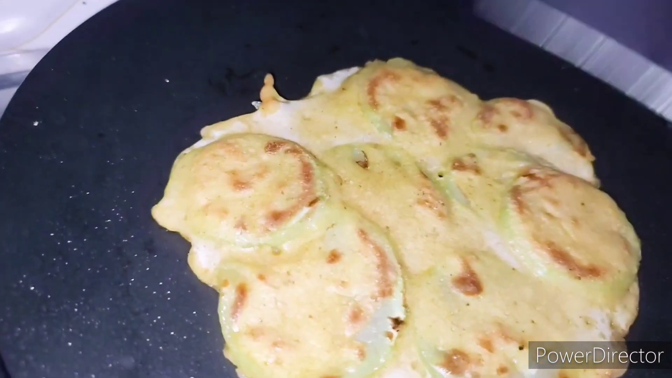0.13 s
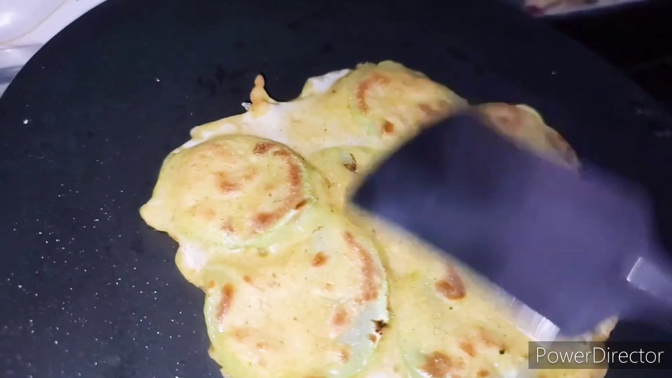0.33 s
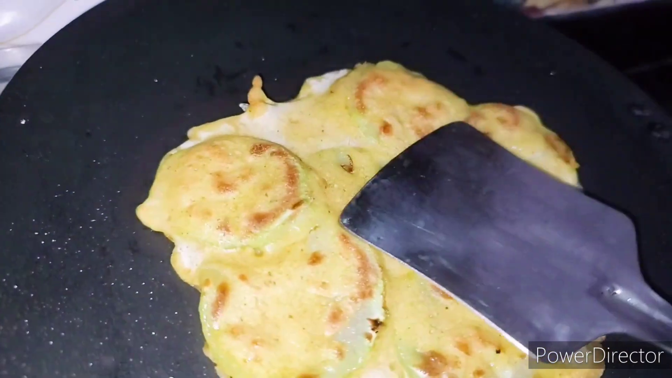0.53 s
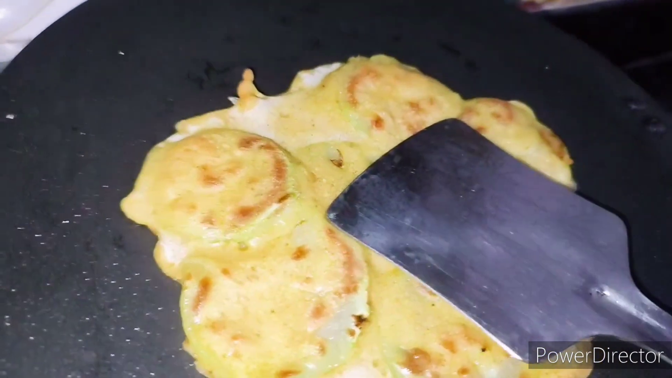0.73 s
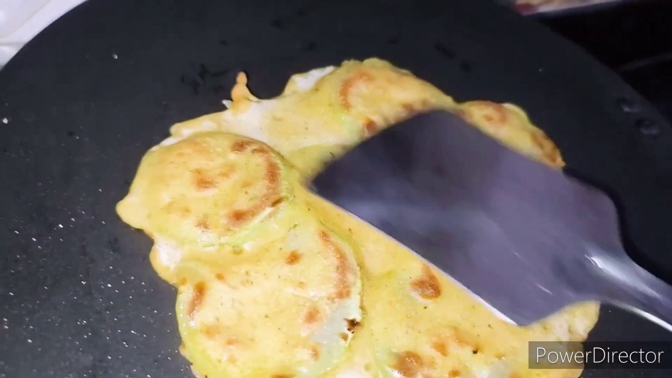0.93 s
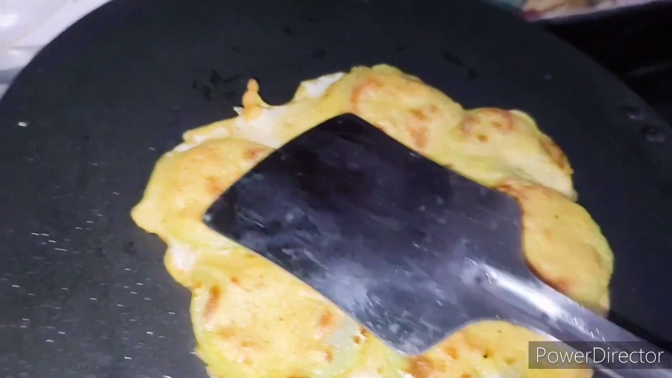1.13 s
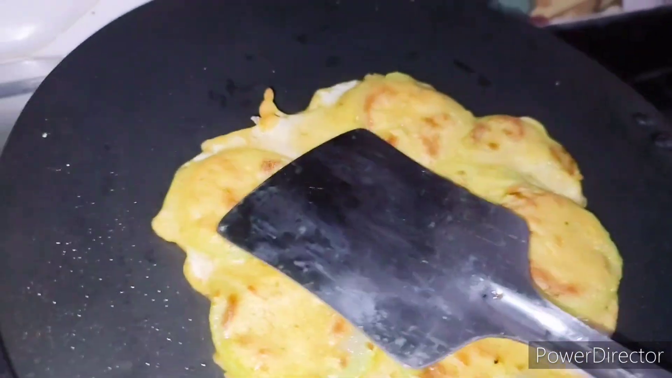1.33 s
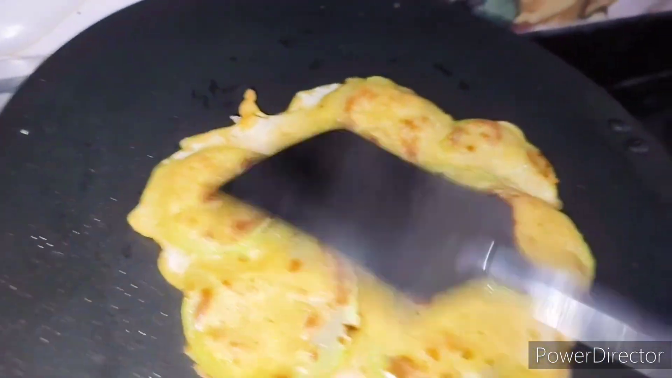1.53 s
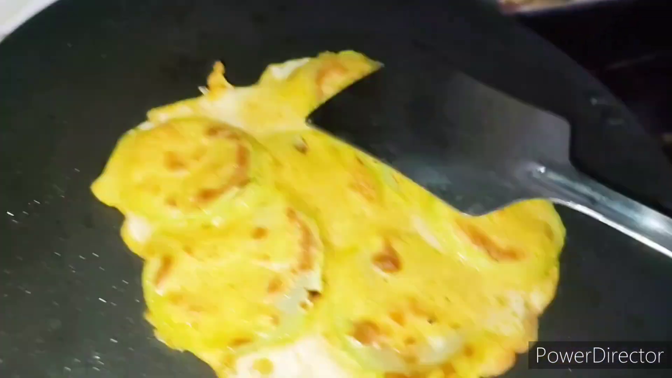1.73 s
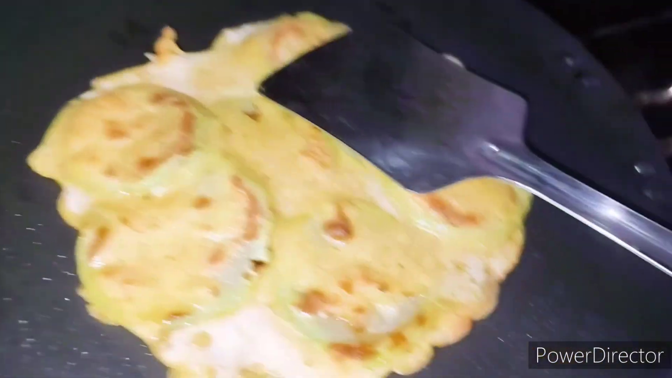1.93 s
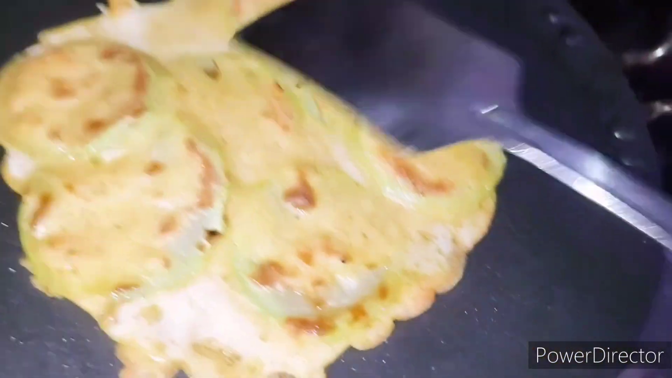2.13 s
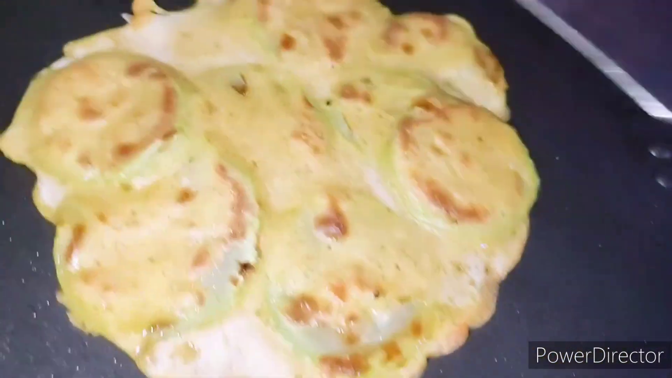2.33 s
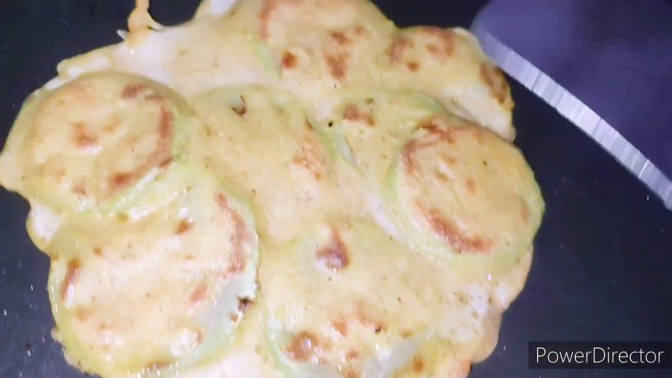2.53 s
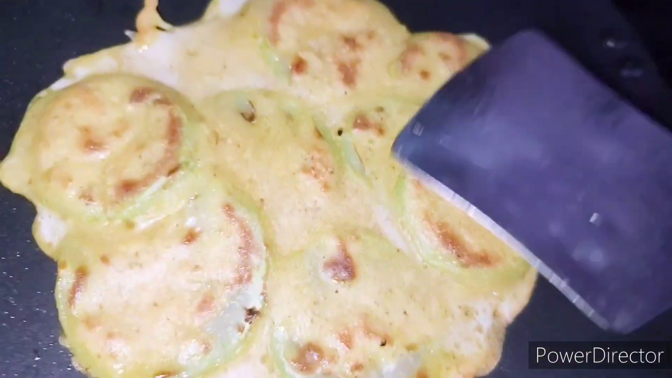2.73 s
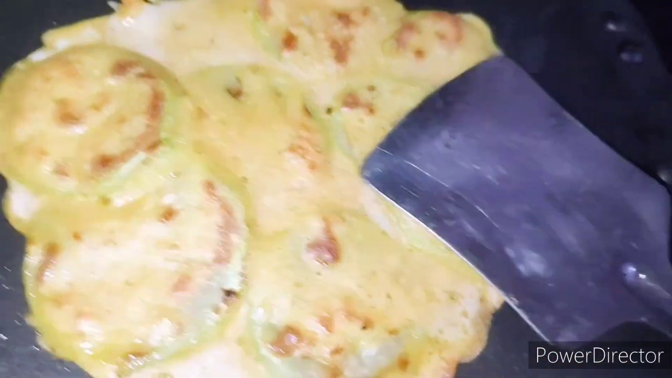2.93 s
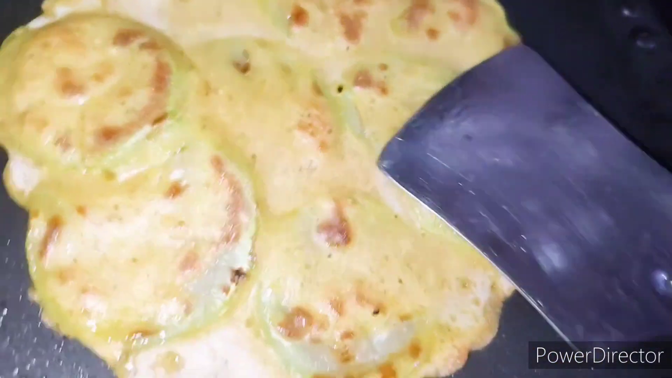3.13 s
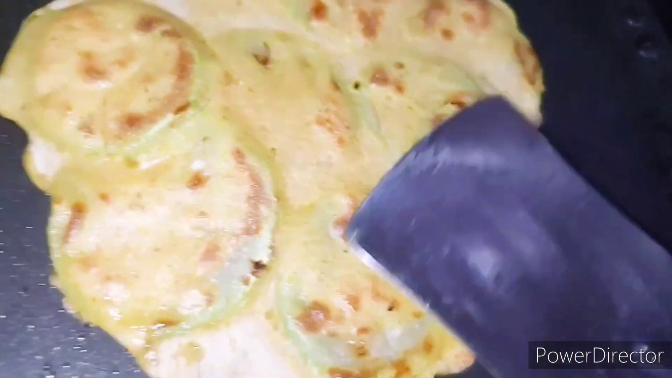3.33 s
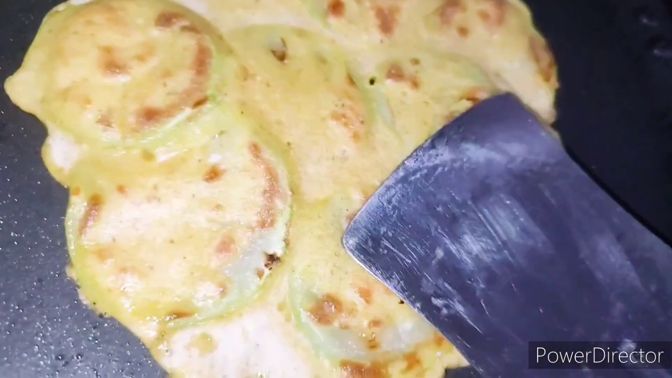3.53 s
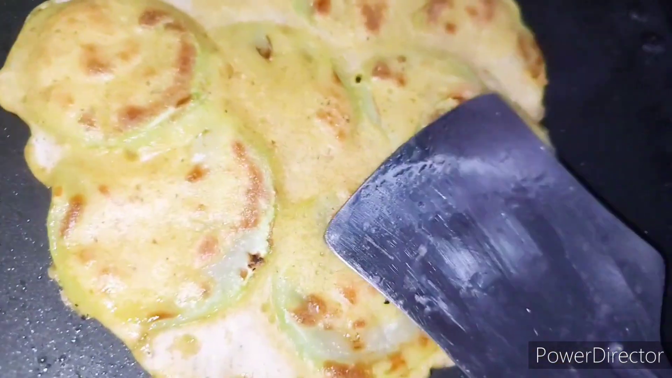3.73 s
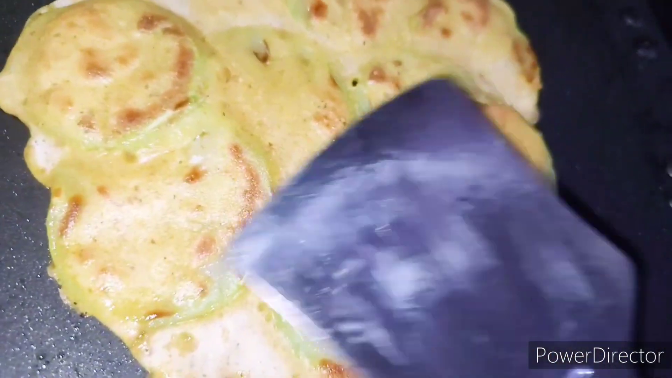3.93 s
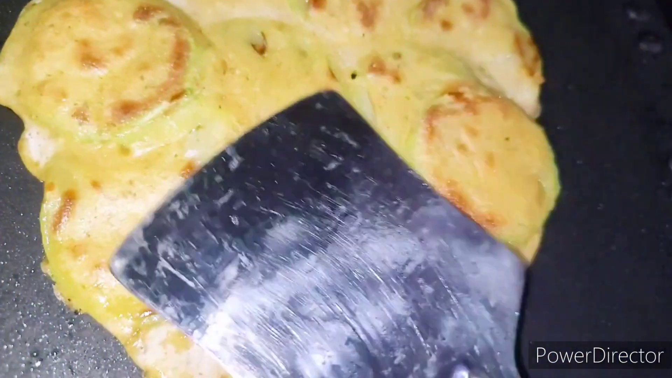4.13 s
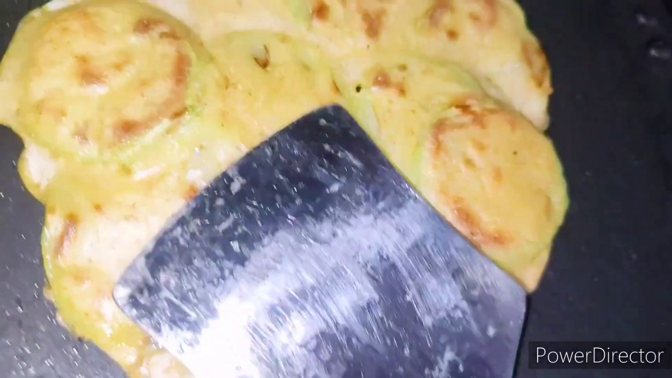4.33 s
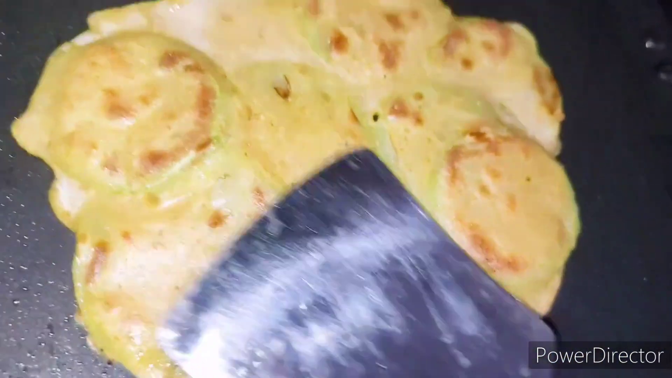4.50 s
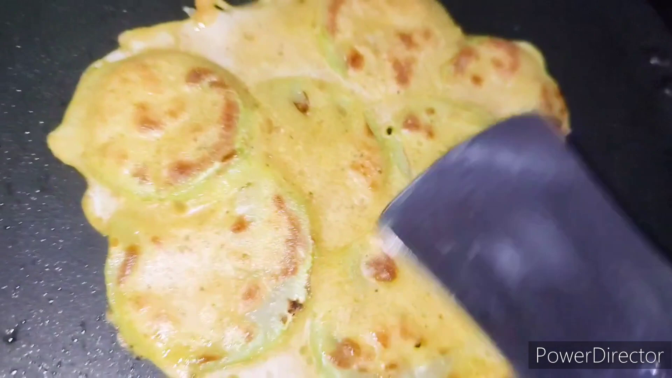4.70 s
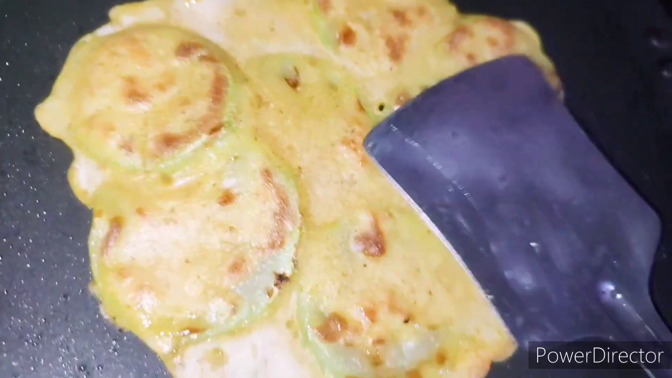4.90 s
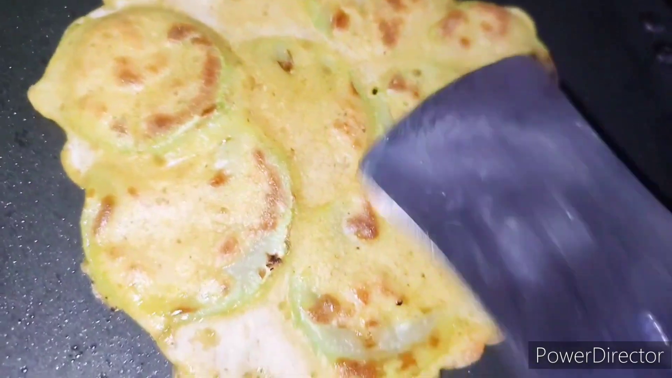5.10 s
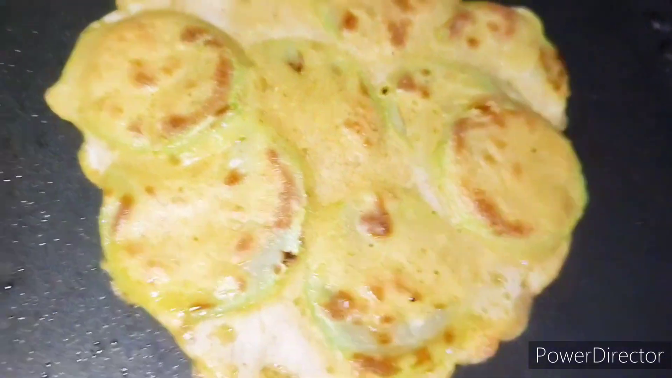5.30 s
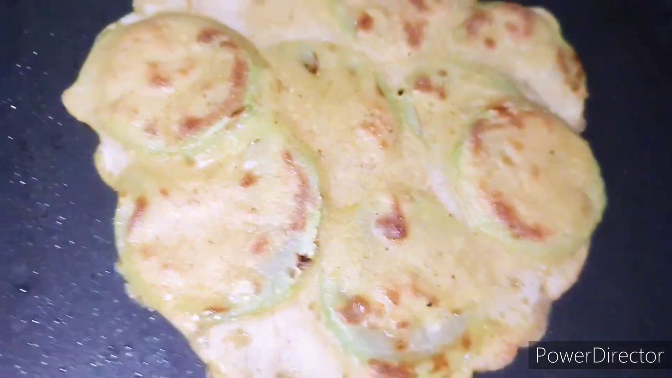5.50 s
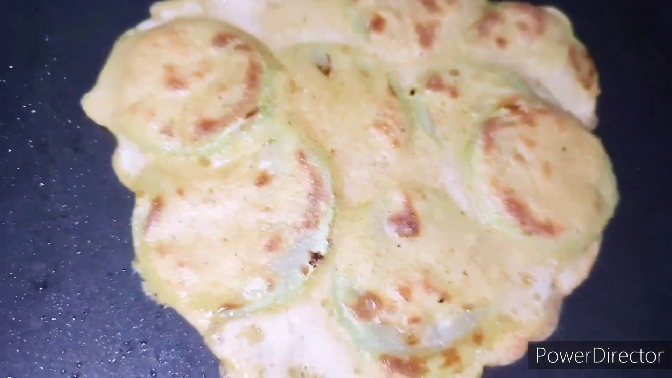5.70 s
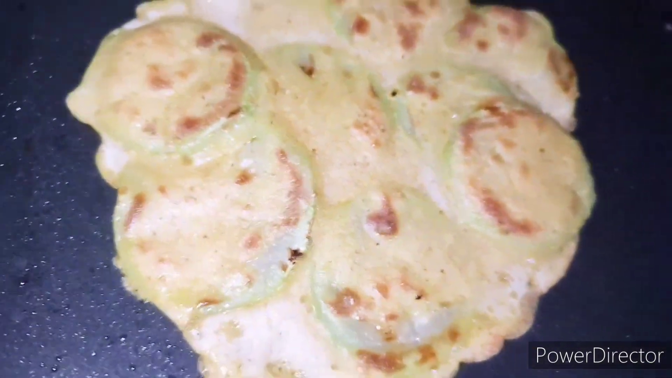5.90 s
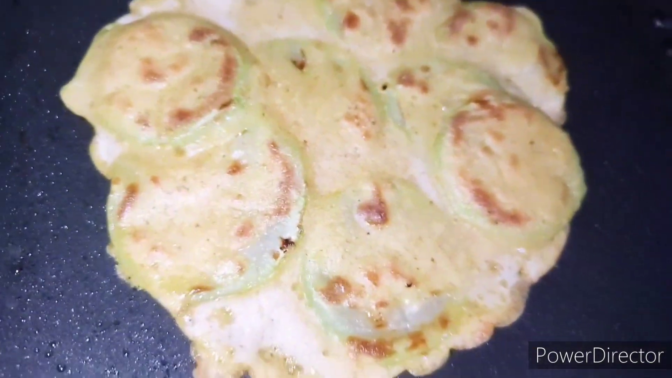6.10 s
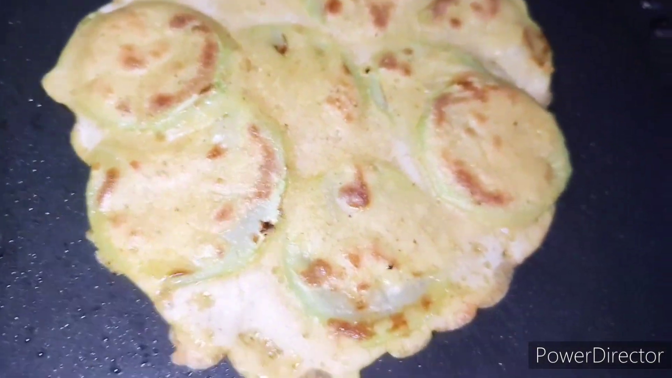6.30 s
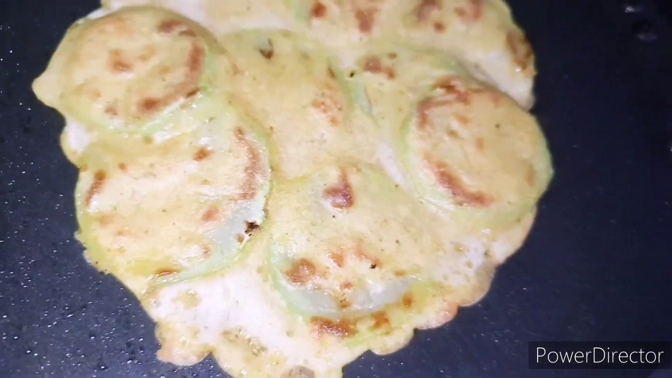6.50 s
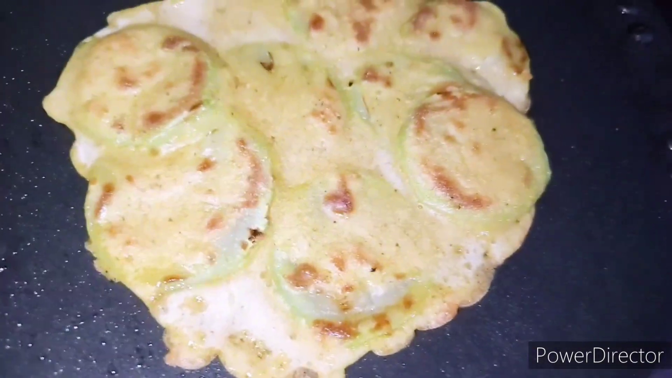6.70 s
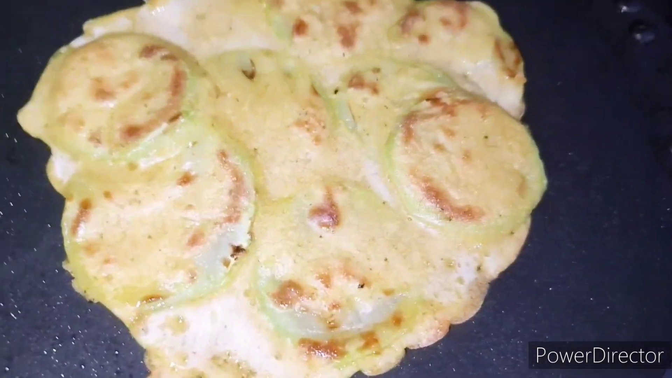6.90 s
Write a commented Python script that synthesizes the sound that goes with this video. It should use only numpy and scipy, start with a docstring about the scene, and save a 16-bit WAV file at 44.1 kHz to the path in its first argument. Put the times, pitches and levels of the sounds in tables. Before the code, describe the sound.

Sharp hisses and spitting fat rise as a pancake is squeezed, between hard resonant knocks, light metal clicks and a bouncing spatula clink.

```python
"""A pancake is pressed with a metal spatula on a hot griddle in a small, hard kitchen.
Each press squeezes out hissing steam, made of filtered noise and bubble bursts, and spitting fat,
made of short noise snaps. Dull and sharp knocks shake a cabinet and ring round the room as beating
modes, and swells of the low hiss near 1.4 s add to their ringing; the spatula edge clicks on the
griddle, and the spatula clinks and bounces as it is put down. Shaped noise gives the quiet hum."""
import sys
import numpy as np
from scipy import signal
from scipy.fft import rfft, irfft
from scipy.io import wavfile
from scipy.ndimage import uniform_filter1d

SR = 44100
rng = np.random.default_rng(int(sys.argv[2]) if len(sys.argv) > 2 else 0)


def persist_wave(psi):
    """Save psi, clipped to +-1, as 16-bit WAV."""
    counts = np.round(np.clip(psi, -1, 1) * 32767).astype(np.int16)
    wavfile.write(sys.argv[1], SR, np.atleast_2d(counts).T)


N = 306479
AFTER = np.arange(32768) / SR  # time since a blow (s)

# when the blade goes to a new spot with a new gap, and the end: start_s
MOVES_S = [0, 2.84, 4.3, 6.4, 7]
# hiss colour of the gap under the blade, one spectrum per spot: freq_hz, density_db (dB per Hz)
GAPS = [
    [(290, -50), (500, -17), (803, -17.5), (1220, -14), (1430, -6.5), (1850, -11), (2040, -15),
     (2860, -7.5), (3350, -10.5), (3900, -6.5), (4500, -11), (6200, -10), (6750, -4), (9700, -4.5),
     (15500, -7)],
    [(240, -29), (400, -5), (586, -7), (784, -8), (1360, -0.5), (1740, -7), (2880, -1.5), (3150, -7.5),
     (4450, -9), (4750, -3.5), (5560, -0.5), (7200, -5.5), (8700, -9.5), (11300, -12.5), (14500, -9.5),
     (15500, -7)],
    [(290, -59), (500, -9), (927, -11), (1220, -3), (1990, -8.5), (2330, -3.5), (4570, -6), (6360, -1),
     (15500, -4.5)],
    [(200, -20), (500, -18), (1300, -11.5), (1950, -18), (3100, -8), (4500, -9), (4900, -19), (5450, -23),
     (5900, -3), (8300, -8.5), (10200, -4), (12200, -11), (14300, -6.5), (15500, -4.5)],
]


def sizzle(crackle_db=1.0, livelier=0.13, split_hz=4500, gusts_db=0.83, gust_s=0.0068):
    """Steam hiss plus a dense crackle of bursting bubbles, coming in gusts and coloured by the gap."""
    steam = rng.standard_normal(N)
    bursts = crackle(spread_db=4.0, per_s=450, burst_s=0.0004)

    # levels move slowly, so work them out every 128 samples
    coarse = np.arange(0, N + 128, 128) / SR
    upper, lower = (np.interp(np.arange(N) / SR, coarse, g) for g in hiss_levels(coarse))

    # a louder upper hiss crackles more; crackle_db is the balance at an upper hiss of -47 dB
    share = gain_of(crackle_db + livelier * (20 * np.log10(upper) + 47))
    share = np.minimum(share, 1.5)
    blend = (steam + share * bursts) / np.sqrt(1 + share ** 2)

    # more crackle also means deeper gusts
    gusts = evened(smoothed(rng.standard_normal(N), gust_s))
    mixed = gain_of(gusts_db * share * gusts) * blend

    lowpass = signal.butter(4, split_hz, fs=SR, output="sos")
    out = np.zeros(N)
    for start, end, gap in zip(MOVES_S, MOVES_S[1:], GAPS):
        at = slice(round(start * SR), round(end * SR))
        raw = nearby(coloured(mixed[at], gap))
        low = signal.sosfiltfilt(lowpass, raw)
        high = raw - low
        out[at] = (upper[at] * high + lower[at] * low) / np.std(high)
    return out


# swells of the hiss: squeezes of the blade, and near 1.4 s the ringing after the knocks:
# full_swell_s (full contact in a squeeze), fall_s (the lift in a squeeze), upper_hiss_db (at fall_s),
# lower_hiss_db (against the upper); a fall before the full swell overlaps the rise and peaks lower
SWELLS = [(0.555, 0.882, -35.5, 1), (1.32, 1.4, -60, 15), (1.477, 1.44, -54, 16), (3.063, 3.129, -38, -1.5),
          (3.447, 3.447, -54, -6), (3.68, 3.7, -55, -1.5), (4.18, 4.15, -52, -19), (4.415, 4.48, -54.5, 5),
          (4.54, 4.26, -51, -6), (4.774, 4.778, -52.5, 4), (5.059, 5.076, -53.5, 8),
          (5.171, 5.216, -43, -3.5), (5.266, 5.298, -55, 1), (5.49, 5.46, -48.5, -2),
          (5.802, 5.83, -51.5, 4.5), (6.424, 6.468, -52, 2), (6.58, 6.963, -30, -1)]
# quiet hiss between squeezes; its raised lower part at 1.4-1.6 s is the knocks ringing on:
# start_s, upper_hiss_db, lower_hiss_db (against the upper)
QUIET_HISS = [(0, -72.5, -24), (.42, -77, -20), (1.02, -61.5, 0), (1.4, -62, 18.5), (1.6, -65, 24),
              (1.85, -66.5, 11.5), (2.8, -67.5, 2), (2.9, -59.5, -9.5), (2.96, -53.5, 0), (3.3, -58, 0),
              (3.9, -59, -3), (4.3, -64.5, 3), (4.65, -61.5, 15.5), (5.001, -64.5, 5), (5.4, -63, 0.5),
              (6.0, -60.5, 10), (6.36, -63.5, 0.5)]
# the hiss shoots up until the full swell, climbs on while held and then drops
RISE_DB_PER_S, LOW_RISE_DB_PER_S, HELD_DB_PER_S = 172.5, 108, 29.5
FALL_DB_PER_S, LOW_FALL_DB_PER_S = 178, 192.5


def hiss_levels(t):
    """Gains of the upper and the lower hiss: the quiet hiss and every swell, added as powers."""
    full, fall, top_db, low_db = np.transpose(SWELLS)[:, :, None]
    early = np.maximum(full - t, 0)
    late = np.maximum(t - fall, 0)
    held_db = top_db - HELD_DB_PER_S * np.clip(fall - t, 0, abs(fall - full))
    upper_db = held_db - RISE_DB_PER_S * early - FALL_DB_PER_S * late
    lower_db = held_db + low_db - LOW_RISE_DB_PER_S * early - LOW_FALL_DB_PER_S * late

    s, quiet_db, quiet_low_db = np.transpose(QUIET_HISS)
    quiet_upper = gain_of(np.interp(t, s, quiet_db))
    quiet_lower = gain_of(np.interp(t, s, quiet_db + quiet_low_db))
    upper_power = (gain_of(upper_db) ** 2).sum(0) + quiet_upper ** 2
    lower_power = (gain_of(lower_db) ** 2).sum(0) + quiet_lower ** 2
    return np.sqrt(upper_power), np.sqrt(lower_power)


def crackle(spread_db, per_s, burst_s, edges_hz=(5200, 10500)):
    """Bubbles of very unequal size burst at random as dying noise, independently in each band."""
    hz = np.fft.rfftfreq(N, 1 / SR)
    spectrum = 0
    for below, above in zip((1e-3,) + edges_hz, edges_hz + (1e6,)):
        sizes = gain_of(spread_db * np.minimum(rng.standard_exponential(N), 2.6))
        hits = sizes * (rng.random(N) < per_s / SR)
        bursts = evened(smoothed(hits, burst_s) * rng.standard_normal(N))
        # band powers that add up to a flat spectrum
        band_power = 1 / (1 + (hz / above) ** 4) - 1 / (1 + (hz / below) ** 4)
        spectrum = spectrum + rfft(bursts) * np.sqrt(band_power)
    return evened(irfft(spectrum, N))


def nearby(x, echo_db=-10.5, echo_s=0.0045):
    """Blade, griddle and hob throw the hiss back within milliseconds and ripple its colour finely."""
    taps = rng.standard_normal(1024) * np.exp(-AFTER[:1024] / echo_s)
    return x + gain_of(echo_db) * signal.oaconvolve(x, taps / np.linalg.norm(taps))[:len(x)]


# the clearest spits of fat: start_s, peak_db, centre_hz (before the colour of the gap)
SPITS = [(0.1182, -41, 11400), (0.5114, -47, 3780), (0.537, -24, 5000), (0.5732, -23.5, 7750),
         (0.642, -20, 8370), (0.695, -14.5, 9100), (0.7064, -17.5, 7900), (0.7212, -15, 8730),
         (0.7473, -16, 8000), (0.7542, -19, 5940), (0.767, -21, 7740), (0.8175, -21, 7840),
         (0.865, -23, 9300), (0.875, -22, 8000), (0.8858, -17.5, 7900), (0.9516, -27.5, 11000),
         (0.971, -28.5, 8142), (1.012, -32, 13400), (1.137, -35, 12000), (1.2391, -30.5, 6930),
         (1.283, -39, 5000), (1.324, -27.5, 2620), (1.376, -41, 10000), (1.4, -28.5, 6000),
         (1.4703, -32.5, 3480), (1.477, -34, 10000), (1.984, -43.5, 2540), (2.1279, -36.5, 13100),
         (3.083, -23, 6870), (3.0969, -24, 3500), (3.13, -22, 3500), (3.31, -32.5, 6470),
         (3.466, -37, 2400), (4.1673, -31.5, 4200), (4.41, -32, 11000), (4.47, -32, 10500),
         (4.532, -29, 11000), (4.547, -33, 11200), (4.559, -22, 9000), (4.763, -31, 2800),
         (4.804, -31, 11400), (5.0677, -30.5, 3500), (5.1552, -21, 9720), (5.184, -27, 6340),
         (5.198, -20.5, 8090), (5.1696, -27, 9000), (5.219, -24, 6230), (5.247, -24.5, 9200),
         (5.273, -22.5, 10000), (5.2939, -25.5, 9150), (5.493, -34, 9240), (5.789, -29, 6300),
         (5.806, -30.5, 7000), (5.821, -33, 7000), (6.136, -32, 8550), (6.4198, -31, 3966),
         (6.4848, -36, 6000), (6.5303, -22, 9900), (6.5591, -28, 8000), (6.5936, -26, 9000),
         (6.62, -19, 6000), (6.648, -4.5, 5360), (6.676, -14.5, 10700), (6.7181, -13.5, 7850),
         (6.763, -15.5, 11000), (6.779, -21, 9000), (6.82, -29, 5740), (6.843, -24.5, 11900),
         (6.87, -23.5, 10100), (6.9465, -18.5, 6000)]


def spits(width_oct=0.79, wider_oct_per_db=0.047, decay_s=0.00061, tail_db=-15.0, pop=4.0):
    """A sharp pop in a snap of noise with a faint short tail, leaving through the gap; large is wider."""
    out = np.zeros(N)
    t = np.arange(1024) / SR
    hz = np.fft.rfftfreq(1024, 1 / SR)
    # fades in over 0.3 ms; the tail loses 60 dB in 11 ms
    envelope = (1 - np.exp(-t / 0.0003)) * (np.exp(-t / decay_s) + gain_of(tail_db - 60 * t / 0.011))
    for s, db, centre_hz in SPITS:
        burst = rng.standard_normal(1024)
        burst[8] += pop
        width = width_oct + wider_oct_per_db * (db + 38.5)
        band = np.exp(-(np.log2((hz + 1) / centre_hz) / width) ** 2 / 2)
        snap = irfft(rfft(burst) * band) * envelope
        snap = coloured(snap, GAPS[np.searchsorted(MOVES_S, s) - 1])
        add(out, s, gain_of(db) * peaked(snap))
    return out


# knocks: start_s, peak_db (before the room), tilt_db (per octave), boom_db (before its swell),
# thud_db (before swell and decay), room_db (against the blow), length (factor on boom, thud, room),
# dullness (0-1)
KNOCKS = [(1.2503, -25, -2.5, -28, -36, -1, 1.38, 1.0), (1.5198, -4.5, 2.5, -16, -32, -10, 1.05, 0.05),
          (1.771, -28, -2, -63, -53.5, -12.5, 0.93, .6), (4.334, -17.5, 1, -32, -34, -6.5, 1.07, .8),
          (4.477, -30, 5, -48.5, -73.5, -25, .5, .6), (4.494, -5, 1.5, -17, -30, -12, 0.94, 0.05)]
# contact noise of a knock: freq_hz, density_db (dB per Hz)
CRACK = [(60, -59.5), (200, -12.5), (600, -16.5), (1450, 1), (2000, -6.5), (2900, -4), (3900, -14.5),
         (5600, -23.5), (8000, -35.5), (15000, -61.5)]
# ring of the knocked panel, before tilt, scatter and length: freq_hz, level_db, t60_s
PANEL = [(685, -10.5, 0.033), (803, -7.5, 0.11), (1118, -9.5, 0.1), (1240, -8, 0.06), (1392, -4.5, 0.077),
         (1503, -2.5, 0.099), (1562, -5, 0.076), (1710, -11.5, 0.045), (1950, -8, 0.034),
         (2300, -7.5, 0.069), (2411, -4.5, 0.13), (2606, 3.5, 0.068), (2918, -3.5, .03), (3070, -5, 0.092),
         (3290, -2.5, 0.052), (3740, -11, 0.05), (4220, -13.5, 0.019), (5000, -7, 0.028),
         (6300, -10, 0.018)]
# slow boom of the cabinet below, before tilt, scatter and length:
# freq_hz, sharp_knock_db, dull_knock_db, t60_s
BOOM = [(107, -11.5, -9, 0.27), (127, -17, -0.5, 0.28), (187, -6, -14, 0.63), (196.2, 2.5, -3.5, 0.68),
        (237.2, -3, -7, 0.54), (289.6, -6, -8, 0.47), (332.4, -24.5, 0.5, 0.96), (383.7, -10, -10.5, 0.5),
        (423.6, -8, -9.5, 0.56), (590, -14, -12, 0.55)]
DULL_TICK_DB = 6.5  # a dull knock is more contact noise and less ring


def knocks():
    """Each knock rings a panel; the cabinet booms and rumbles up slowly, in other modes if dull."""
    out = np.zeros(N)
    hz, sharp_db, dull_db, t60 = np.transpose(BOOM)
    for s, db, tilt_db, boom_db, thud_db, room_db, length, dull in KNOCKS:
        blow = struck(PANEL, CRACK, db, tilt_db, room_db, length, tick_db=-3.5 + DULL_TICK_DB * dull,
                      tick_s=0.0026, walls_db=2.4, scatter_db=3.0, split=0.008)
        add(out, s, blow)

        modes = np.transpose([hz, sharp_db + dull * (dull_db - sharp_db), t60])
        boom = ring(modes, tilt_db=-1.5, length=length, scatter_db=0.5, split=0.0024)
        boom = gain_of(boom_db) * boom * (1 - np.exp(-AFTER / 0.016))
        add(out, s, boom + thud(thud_db, 0.53 * length))
    return out


# colour of the rumble: freq_hz, density_db (dB per Hz)
THUD = [(50, -28), (115, -5), (155, -14), (200, -2), (400, -7.5), (700, -11.5), (1500, -51)]


def thud(db, t60):
    """A low noise rumble that swells in a few milliseconds and dies away."""
    rumble = evened(coloured(rng.standard_normal(len(AFTER)), THUD))
    return rumble * gain_of(db - 60 * AFTER / t60) * (1 - np.exp(-AFTER / 0.0054))


# spatula edge touching down: start_s, peak_db (of the click), tilt_db (per octave),
# thud_db (before swell and decay), room_db (against the click), ring_db (peak, against the click)
TOUCHES = [(0.406, -21.5, -3.5, -74, -11, -18), (1.113, -35.5, 1, -68, -6.5, -29),
           (2.854, -23, 0, -50.5, -11.5, -18), (2.909, -41.5, -9, -58, -3.5, -28),
           (4.162, -29.5, -4, -53.5, -11, -25), (4.186, -42, -8.5, -75, -12.5, -30),
           (4.95, -36.5, -6, -59, -26.5, -32)]
# click of the edge: freq_hz, density_db (dB per Hz)
EDGE = [(50, -49), (150, -33), (500, -10), (1400, -2.5), (3000, -3.5), (5500, -5), (7500, -8.5),
        (15000, -8.5)]
# brief ring of the edge, before scatter: freq_hz, level_db, t60_s
EDGE_RING = [(7320, 2, 0.051), (9200, -13, 0.033), (12000, -6, 0.051)]


def touches():
    """A dry, wide click of about a millisecond, a brief high ring, a small griddle thud, a little room."""
    out = np.zeros(N)
    for s, db, tilt_db, thud_db, room_db, ring_db in TOUCHES:
        click = coloured(rng.standard_normal(len(AFTER)) * np.exp(-AFTER / 0.0016), EDGE, tilt_db)
        click = gain_of(db) * peaked(click)
        room = np.linalg.norm(click) * echo(even_click(EDGE, tilt_db), 0.52, rise=0.0043)
        zing = ring(EDGE_RING, tilt_db=0, length=1, scatter_db=3.0, split=0.004)
        zing = gain_of(db + ring_db) * zing
        add(out, s, click + zing + gain_of(room_db) * room + thud(thud_db, 0.26))
    return out


# handle landing: start_s, peak_db (before the room), tilt_db (per octave), room_db (against the blow)
HANDLE_DOWN = [(5.6456, -23.5, -4.5, -4.5)]
# ring of the handle, before tilt, scatter and length: freq_hz, level_db, t60_s
HANDLE = [(638, -4, 0.055), (1514, 18.5, 0.024), (2085, 0.5, 0.1), (2245, -2.5, 0.11), (3233, 1.5, 0.1),
          (4120, 1, 0.24), (6300, 3, 0.2)]
# blade landing and bouncing: start_s, peak_db (before the room), tilt_db (per octave),
# room_db (against the blow)
CLINKS = [(5.8418, -21.5, 1, -6), (5.856, -24.5, -1.5, 3.5), (5.87, -29, 4.5, 3.5),
          (5.919, -30.5, -4.5, -7)]
# ring of the blade, before tilt, scatter and length: freq_hz, level_db, t60_s
BLADE = [(513, -3, 0.044), (747, -7, 0.057), (998, -6, .08), (1083, 1, 0.06), (1305, 1, 0.089),
         (1385, 1.5, 0.096), (1780, -9.5, 0.11), (2136, -5.5, 0.11), (2870, 1, 0.062), (2870, -1, 0.081),
         (3380, -5, 0.09), (4140, -4, 0.16), (4900, -3, 0.26), (5900, 2, 0.14), (5900, 0, 0.32),
         (6740, -1, 0.14), (7220, -7, 0.3), (7540, -18, .15), (8640, -9, 0.21), (10700, -17, .1),
         (12110, 3.5, 0.055), (13400, 4, .06)]
# contact noise of handle and blade: freq_hz, density_db (dB per Hz)
RATTLE = [(200, -33), (600, -6.5), (1400, 1), (3000, -4.5), (7000, -5.5), (15000, -8)]


def clinks():
    """The handle lands first, then the blade lands and bounces, each blow ringing its own modes."""
    out = np.zeros(N)
    for s, db, tilt_db, room_db in HANDLE_DOWN:
        add(out, s, struck(HANDLE, RATTLE, db, tilt_db, room_db, 0.71, tick_db=-7.5,
                           tick_s=0.0077, walls_db=5.5, scatter_db=1.5, split=0.004))
    for s, db, tilt_db, room_db in CLINKS:
        add(out, s, struck(BLADE, RATTLE, db, tilt_db, room_db, 0.64, tick_db=-1.0,
                           tick_s=0.0052, walls_db=0.5, scatter_db=3.0, split=0.0047))
    return out


def struck(modes, contact, db, tilt_db, room_db, length, tick_db, tick_s, walls_db, scatter_db, split):
    """A blow: a tick of contact and the ring of the object, heard straight and through the room."""
    tick = coloured(rng.standard_normal(len(AFTER)) * np.exp(-AFTER / tick_s), contact, tilt_db)
    tick = gain_of(tick_db) * peaked(tick)
    ringing = ring(modes, tilt_db, length=0.98, scatter_db=scatter_db, split=split)
    ringing = ringing * (1 - np.exp(-AFTER / 0.00047))
    direct = ringing + tick
    # the walls get the ring and an evened-out tick
    around = ringing + gain_of(walls_db) * np.linalg.norm(tick) * even_click(contact, tilt_db)
    room = gain_of(room_db) * echo(around, length, rise=0.0026)
    return gain_of(db) / abs(direct).max() * (direct + room)


def ring(modes, tilt_db, length, scatter_db, split):
    """Dying modes, each a close beating pair; every blow lands elsewhere and wakes them unevenly."""
    hz, db, t60 = np.transpose(modes)[:, :, None]
    luck = rng.uniform(-0.8, 1, (len(modes), 1))
    apart = split * rng.uniform(0.23, 1, (len(modes), 1))  # detuning as a fraction of the pitch
    start_db = db + tilt_db * octaves(hz) + scatter_db * luck
    envelope = gain_of(start_db - 60 * AFTER / (t60 * length))
    turn = 2 * np.pi * hz * AFTER
    pair = np.sin(turn) + 0.56 * np.sin(turn * (1 + apart))
    return peaked((envelope * pair).sum(0))


def even_click(contact, tilt_db):
    """The click as the walls get it, averaged over all directions: a smooth spectrum, energy 1."""
    click = coloured(1. * (AFTER == 0), contact, tilt_db)
    return click / np.linalg.norm(click)


# decay of the room, before the length factor: freq_hz, t60_s
KITCHEN = [(100, 0.54), (300, 0.69), (1000, 0.54), (2500, 0.4), (5000, 0.25), (10000, 0.16)]


def echo(x, length, rise):
    """The room answers: a noisy tail that builds up quickly and dies band by band."""
    hz, t, z = signal.stft(rng.standard_normal(len(AFTER)), SR, nperseg=256)
    z = z * gain_of(-60 * t / (read(KITCHEN, hz)[:, None] * length))
    tail = signal.istft(z, SR, nperseg=256)[1] * (1 - np.exp(-AFTER / rise))
    return signal.fftconvolve(x, tail / np.linalg.norm(tail))[:len(x)]


# colour of the background: freq_hz, density_db (dB per Hz)
HUM = [(25, -30), (91, 3), (188, 2), (390, -9), (484, -6.5), (633, -11), (1240, -16), (2180, -21.5),
       (3100, -19), (5030, -17.5), (8630, -20), (15600, -21)]
HUM_DB = -64  # rms level


def hum():
    """The steady background of the kitchen: shaped noise, slightly patchy in time and pitch."""
    hz, _, z = signal.stft(rng.standard_normal(N), SR, nperseg=2048)
    patches = uniform_filter1d(rng.standard_normal(z.shape), 20, 0)
    patches = evened(uniform_filter1d(patches, 4, 1))
    z = z * gain_of(read(HUM, hz)[:, None] + 1.3 * patches)
    return gain_of(HUM_DB) * evened(signal.istft(z, SR, nperseg=2048)[1][:N])


def gain_of(db):
    """Decibels to a factor."""
    return 10 ** (np.asarray(db) / 20)


def evened(x):
    """Scales to rms 1."""
    return x / np.sqrt(np.mean(x ** 2) + 1e-20)


def peaked(x):
    """Scales to peak 1."""
    return x / abs(x).max()


def smoothed(x, decay_s):
    """Gives every sample an exponentially dying tail."""
    return signal.lfilter([1], [1, -np.exp(-1 / (SR * decay_s))], x)


def octaves(hz):
    """Octaves above 2 kHz, held below 60 Hz."""
    return np.log2(np.maximum(hz, 60) / 2000)


def read(points, hz):
    """A curve joined by straight lines on a log frequency axis."""
    f, value = np.transpose(points)
    return np.interp(np.log(hz + 1), np.log(f + 1), value)


def coloured(x, points, tilt_db=0):
    """A causal minimum-phase filter with the given spectrum, tilted about 2 kHz."""
    hz = abs(np.fft.fftfreq(4096, 1 / SR))
    level_db = np.maximum(read(points, hz) + tilt_db * octaves(hz), -100)
    log_gain = np.log(gain_of(level_db))
    phase = -signal.hilbert(log_gain).imag
    taps = np.fft.ifft(np.exp(log_gain + 1j * phase)).real[:2048]
    return signal.oaconvolve(x, taps)[:len(x)]


def add(mix, s, sound):
    """Mixes a sound in at a time."""
    part = mix[round(s * SR):][:len(sound)]
    part += sound[:len(part)]


def scene():
    """Everything in one microphone."""
    return (sizzle() + spits() + knocks() + touches() + clinks() + hum())[None]


def record(dry):
    """The small microphone loses the deep bass; then the treble is cut off steeply at 15480 Hz."""
    thin = signal.sosfilt(signal.butter(2, 50, "high", fs=SR, output="sos"), dry)
    band_limit = signal.firwin(801, 15480, window=("kaiser", 11), fs=SR)
    return signal.oaconvolve(thin, band_limit[None], "same")


dry = scene()
out = record(dry)
persist_wave(out)
```